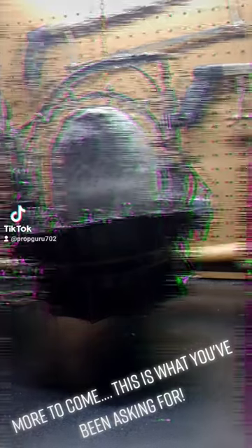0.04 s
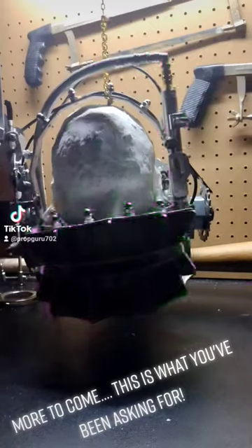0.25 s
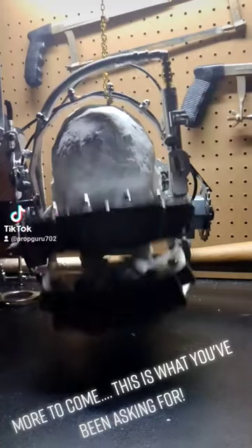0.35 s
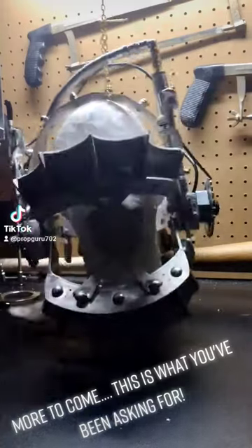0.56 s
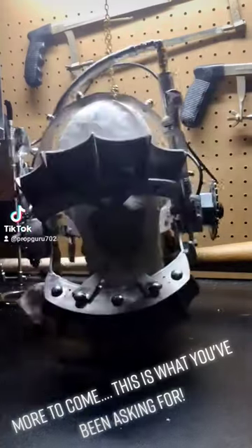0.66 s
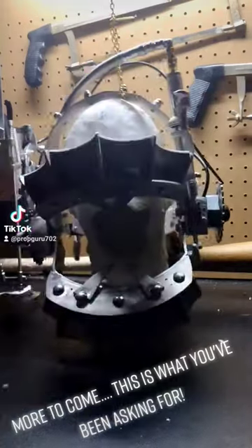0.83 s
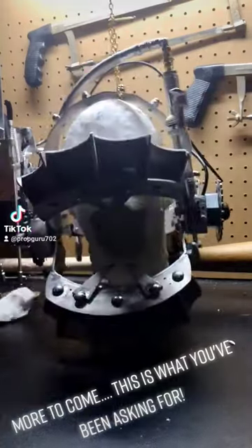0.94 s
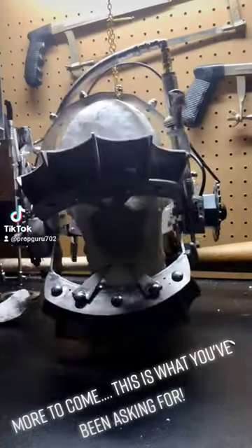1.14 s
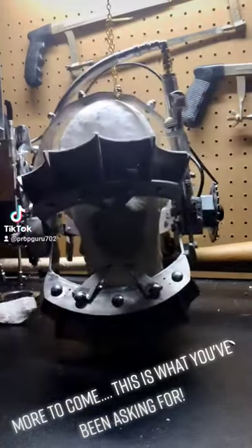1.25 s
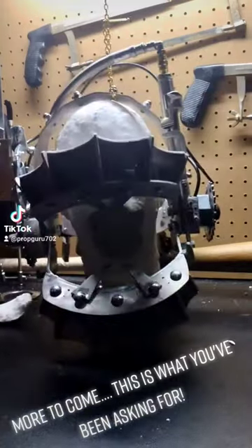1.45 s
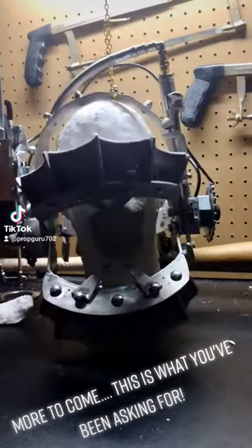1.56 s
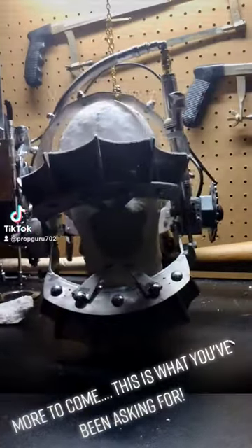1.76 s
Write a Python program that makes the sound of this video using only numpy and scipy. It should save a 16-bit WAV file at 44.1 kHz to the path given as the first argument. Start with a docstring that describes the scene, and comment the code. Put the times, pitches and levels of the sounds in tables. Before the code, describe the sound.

A steel mechanism snaps open on a workbench, close up in a small shop. Quiet low hum comes first, with a faint tick at 0.14 s. Loud, bright clashes hit at 0.22-0.26 s and again around 0.4-0.46 s, jangling and booming the bench. Bright air hiss swells, then fades from 0.75 s. Pieces clatter until 0.9 s; faint knocks continue to about 1.5 s.

```python
"""Steel trap on a workbench

A steel trap snaps open on a wooden bench in a small shop, close to a phone. Latch and jaws clash as
noise bursts and ringing modes, and broken pieces crack, ring and tumble to rest. The bench booms as
modes driven by blows and the rocking frame. Air vents as fading coloured noise on the left, over a
quiet floor of shop air with a low hum."""
import sys
import numpy as np
from scipy import signal
from scipy.fft import rfft, irfft
from scipy.io import wavfile
from scipy.ndimage import uniform_filter1d

SR = 44100
rng = np.random.default_rng(int(sys.argv[2]) if len(sys.argv) > 2 else 0)


def gain_from_db(level_db):
    """Turn a decibel level (scalar or array-like) into a linear amplitude factor."""
    decades = np.asarray(level_db, float) / 20
    return 10 ** decades


def output_pcm(signal):
    """Save a mono or channel-first signal as 16-bit PCM at the path in sys.argv[1].

    Samples are clipped to [-1, 1] before scaling.
    """
    pcm = np.clip(np.atleast_2d(signal).T, -1, 1) * 32767
    wavfile.write(sys.argv[1], SR, np.round(pcm).astype(np.int16))


N = 79380  # length in samples: 1.8 s


def level(x, db):
    """Scale to an rms level in dB."""
    return x * gain_from_db(db) / np.sqrt(np.mean(x ** 2))


def curve(rows):
    """Gain over time from (seconds, dB) rows, practically silent outside them."""
    rows = np.array(rows)
    t = np.arange(N) / SR
    return gain_from_db(np.interp(t, rows[:, 0], rows[:, 1], left=-140, right=-140))


def colour(x, points):
    """Weight the spectrum by (Hz, dB) points joined along a logarithmic frequency scale."""
    p = np.array(points)
    size = x.shape[-1]
    hz = np.maximum(np.arange(size // 2 + 1) * SR / size, 1)
    gain = gain_from_db(np.interp(np.log(hz), np.log(p[:, 0]), p[:, 1]))
    return irfft(rfft(x) * gain, size)


def ring(x, modes, longest_s):
    """Damped resonances set going by x; a unit click gives each about its table level."""
    out = 0
    for k, (hz, db, t60) in enumerate(modes):
        radius = np.exp(-np.log(1000) / (min(t60, longest_s) * SR))
        angle = 2 * np.pi * hz / SR
        poles = [1, -2 * radius * np.cos(angle), radius * radius]
        mode = signal.lfilter([0, np.sin(angle)], poles, x)
        out = out + (-1) ** k * gain_from_db(db) * mode  # every other mode is flipped in sign
    return out


def band(x, hz, width):
    """Gentle band-pass around hz, width in octaves each way."""
    edges = [hz / 2 ** width, min(hz * 2 ** width, .45 * SR)]
    return signal.lfilter(*signal.butter(1, edges, "band", fs=SR), x)


def decay(t60, size):
    """Exponential fall by 60 dB in t60 seconds (at least 0.01), after a 0.17 ms rise."""
    t = np.arange(size) / SR
    return np.minimum(t / 0.00017, 1) * np.exp(-np.log(1000) * t / max(t60, .01))


def add(out, s, x):
    """Mix x in at time s, in seconds."""
    i = int(s * SR)
    out[..., i:i + x.shape[-1]] += x[..., :N - i]


def grains(per_s, spread_db):
    """Random clicks of either sign, uneven but bounded in size."""
    u = rng.random((3, N))
    happens = u[0] < per_s / SR
    size = gain_from_db(spread_db * np.minimum(-np.log(u[2] + 1e-9), 2))
    return happens * np.sign(u[1] - .5) * size


def pan(x, db):
    """Place by level: left louder than right by db; x is one or two channels."""
    return x * gain_from_db(np.array([[db / 2], [-db / 2]]))


# Clashes of steel on steel. Each row: start in seconds, relative level in dB, brightness in octaves
# above 1 kHz, crack's fall by 60 dB in seconds, push on the bench in dB relative to the clash.
STEEL_CLASHES = [(0.1404, -39.5, 2.22, 0.014, -17.5), (0.2208, -8, 1.7, 0.013, -25.5),
                 (0.237, -1, 1.38, .05, -12), (0.2582, -3, 1.4, 0.26, -0.5), (0.368, -25.5, 0.2, .04, 11),
                 (0.392, -3, 0.65, 0.11, -1), (0.409, -9.5, 1.4, 0.091, -1), (0.426, -14, 1, 0.04, 2),
                 (0.46, -8.5, 0.76, 0.08, -6.5)]
# Resonances of the frame. Each row: frequency in Hz, level in dB, longest fall by 60 dB in seconds.
STEEL_MODES = [(1178, -5, 5.0), (1901, -21.5, 0.83), (2277, -20.5, 5.0), (2987, -14, 0.36),
               (3230, -10.5, 0.87), (3170, -1, 0.36), (3680, -9.5, 1.7), (3810, -9.5, 0.63),
               (4450, -8.5, 0.31), (4665, -14, 0.85), (5766, -8, 0.15), (6390, -26, 5.0),
               (6702, -11.5, 0.13), (7235, -24.5, 0.14)]


def steel():
    """Each clash: a crack with thin treble, a duller jangle and frame modes, all chattering; pushes the bench."""
    treble_db, jangle_db, strike_db = -13.5, -13, -62.5
    jangle_t60_s, ring_t60_s = 0.35, 0.45  # longest allowed
    chatter_per_s, chatter_share = 1200, 0.55
    out, push = np.zeros((2, N)), np.zeros(N)
    # each click lifts the loudness, which sinks back within milliseconds
    clicks = np.abs(grains(chatter_per_s, 1.3))
    chatter = level(signal.lfilter([1], [1, -.985], clicks), 0)
    chatter = 1 - chatter_share + chatter_share * chatter
    for s, db, octave, t60, thump_db in STEEL_CLASHES:
        n = rng.standard_normal((3, 16384))
        n = 0.38 * n[0] + 1.2 * n[1:]  # partly alike in both channels
        hz = 1000 * 2 ** octave
        body = level(band(band(n, hz, 1.76), hz, 1.76), -7)
        treble = gain_from_db(treble_db) * band(n, 9000, .9)
        crack = (body + treble) * decay(t60, size=16384)
        jangle = level(band(body, hz * .5, 1.3), jangle_db)
        jangle = jangle * decay(min(jangle_t60_s, 6 * t60), size=16384)
        strike = level(n * decay(0.029, size=16384), strike_db)
        modes = ring(strike, STEEL_MODES, min(ring_t60_s, 3 * t60))
        add(out, s, gain_from_db(db) * (crack + jangle + modes))
        add(push, s, -gain_from_db(db + thump_db) * np.hanning(40))
    return pan(out * chatter, 0.4), push


# Pieces landing on the bench. Each row: start in seconds, relative level in dB, brightness in octaves
# above 1 kHz, ring time in seconds (the ring may fall by 60 dB in up to 1.5 times this).
LANDINGS = [(0.581, -15, 0.84, 0.27), (0.598, -18.5, 0.37, 0.034), (0.606, -30, 1.8, 0.022),
            (0.618, -14, .9, 0.027), (0.638, -7.5, 1.28, 0.02), (0.664, -14.5, 0.49, 0.11),
            (0.755, -15, 0.081, 0.023), (0.78, -16, -0.27, 0.039), (0.792, -19, 0.33, 0.15),
            (0.8061, -6.5, 1.22, 0.1), (0.825, -20.5, 0.16, 0.21), (0.862, -15.5, 0.33, 0.088),
            (0.904, -42, 0.76, 0.03), (0.981, -34, -.5, 0.097), (1.024, -39.5, -0.57, 0.05),
            (1.087, -28.5, 0.03, 0.056), (1.143, -30, 0.85, 0.055), (1.149, -31.5, -0.52, .06),
            (1.166, -32.5, 1.38, 0.071), (1.275, -37, -0.34, 0.09), (1.372, -41.5, -0.33, 0.064),
            (1.434, -38, 1.16, 0.079), (1.443, -34, -0.029, 0.057), (1.459, -32, -0.31, 0.11),
            (1.493, -32, 1.2, 0.06), (1.501, -33.5, -0.63, 0.074), (1.526, -48.5, 1.21, 0.058)]
# Resonances of a piece. Each row: frequency in Hz, level in dB, longest fall by 60 dB in seconds.
PIECE_MODES = [(578.4, 2.5, 0.064), (755, -6.5, 0.12), (841, 5, 0.05), (1000, 4, 0.061), (1130, -4.5, 0.21),
               (1391, 2.5, 0.12), (1606, 3, 0.017), (1833, -0.5, 0.02), (2350, -2, 0.025),
               (2576, 0.5, 0.068), (2954, 1, 0.031), (3256, -14.5, 0.15), (3612, -2.5, 0.1),
               (4120, -4, 0.05)]
# Tumbling between landings. Each row: time in seconds, level in dB before a 3.5 dB cut.
TUMBLE_LEVEL = [(0.43, -16.5), (0.456, -49), (0.464, -17), (0.478, -29), (0.574, -32.5), (0.582, -28),
                (0.632, -30), (0.638, -21), (0.692, -40), (0.8, -28.5), (0.806, -22.5), (0.856, -30),
                (0.864, -23.5), (0.948, -49.5), (1.078, -62), (1.086, -44.5), (1.418, -63.5),
                (1.464, -54.5), (1.632, -66.5), (1.8, -65.5)]


def pieces():
    """Landings crack and ring a piece, each with its own brightness; small random contacts fill the gaps."""
    ring_db, crack_t60_s, thump_db = -13, 0.036, -19.5
    out, push = np.zeros((2, N)), np.zeros(N)
    for s, db, octave, t60 in LANDINGS:
        n = rng.standard_normal((3, 8192))
        n = .7 * n[0] + .7 * n[1:]
        hz = 1000 * 2 ** octave
        modes = ring(n * decay(t60 / 4, size=8192), PIECE_MODES, t60 * 1.5)
        modes = band(band(modes, hz, 0.55), hz, 0.55)
        modes = modes * gain_from_db(ring_db) / modes[:, :882].std()  # level of the first 20 ms
        crack_hz = 0.63 * hz
        crack = band(band(n, crack_hz, 1.3), crack_hz, 1.3)
        # harder landings crack more
        crack = level(crack, 0.5 + 0.43 * db) * decay(crack_t60_s, size=8192)
        add(out, s, gain_from_db(db) * (modes + crack))
        add(push, s, -gain_from_db(db + thump_db) * np.hanning(40))
    small = np.array([grains(per_s=720, spread_db=6.5) for _ in range(3)])
    contacts = small[0] + 0.23 * small[1:]  # mostly alike in both channels
    tumble = level(ring(contacts, PIECE_MODES, .011), -3.5) * curve(TUMBLE_LEVEL)
    return pan(out + tumble, 2.4), push


# Resonances of the bench top. Each row: frequency in Hz, level in dB, longest fall by 60 dB in seconds.
BENCH_MODES = [(118.2, -1.5, 0.28), (169.8, -7, .12), (197.6, -4.5, 0.21), (233, -10.5, 0.17),
               (273.7, -8, 0.43), (349.3, -2.5, 0.15), (437.5, -2, 0.099), (525, -7.5, 0.13),
               (559, -11, 0.084), (652, -3, 0.056), (824, -1.5, .1), (874, 2, 0.027)]
# Frame rocking on the bench. Each row: time in seconds, level in dB before a 2.5 dB cut.
ROCKING_LEVEL = [(0.228, -41), (0.254, -14.5), (0.432, -11.5), (0.572, -33.5), (0.594, -30.5), (0.748, -39),
                 (0.792, -39), (0.862, -43), (0.896, -34.5), (0.954, -51), (1.444, -56.5), (1.496, -47.5),
                 (1.62, -63), (1.8, -64.5)]


def bench(push):
    """The top booms from the blows and from the rocking frame; its sound is cut steeply below about 84 Hz."""
    longest_s, low_hz = 0.35, 84
    rock = np.array([band(grains(per_s=550, spread_db=6.7), 250, 1.1) for _ in range(2)])
    middle = ring(rock[0], BENCH_MODES, longest_s)
    # opposite signs left and right make the rocking wide
    side = .6 * band(ring(rock[1], BENCH_MODES, 0.1), 230, 0.63) * np.array([[1], [-1]])
    rocking = level(middle + side, -2.5) * curve(ROCKING_LEVEL)
    boom = gain_from_db(-41) * ring(push, BENCH_MODES, longest_s)
    thud = gain_from_db(8.5) * band(push, 450, 1.3)
    bass_cut = signal.butter(4, low_hz, "high", fs=SR, output="sos")
    return signal.sosfilt(bass_cut, rocking + boom + thud)


# Loudness of the venting air. Each row: time in seconds, level in dB.
VENT_LEVEL = [(0.26, -60), (0.3, -33.5), (0.36, -31), (0.42, -22.5), (0.47, -23), (0.574, -22.5),
              (0.72, -24), (0.77, -33), (0.84, -31.5), (1.036, -35), (1.206, -40), (1.352, -46),
              (1.46, -54.5), (1.58, -58), (1.8, -67.5)]
# Tone of the venting air. Each row: frequency in Hz, relative spectrum level in dB.
VENT_TONE = [(1200, -29.5), (2500, -12), (4000, -10.5), (6000, -11.5), (7500, -11), (8600, -7),
             (11000, -10.5), (13500, -6), (15000, -1), (16000, -2)]


def vent():
    """Escaping air is bright coloured noise with a slight flutter, partly alike in both channels."""
    flutter_db = 1.27  # rms
    n = rng.standard_normal((4, N))
    flutter = gain_from_db(flutter_db * level(uniform_filter1d(n[3], size=1500), 0))
    hiss = level(colour(0.41 * n[0] + 1.2 * n[1:3], VENT_TONE), 0)
    return pan(hiss * curve(VENT_LEVEL) * flutter, 3.5)


def room(x):
    """Reflections blur into a short noise-like tail, different at each channel."""
    t60_s, tail_db, top_hz = 0.3, -12, 7000
    tail = band(rng.standard_normal((2, 16384)), top_hz / 5, 1.385) * decay(t60_s, size=16384)
    tail = np.pad(tail, ((0, 0), (180, 0)))  # starts 4 ms after the direct sound
    tail = gain_from_db(tail_db) * tail / np.sqrt((tail ** 2).sum(axis=1, keepdims=True))
    return x + signal.fftconvolve(x, tail, axes=1)[:, :N]


# Tone of the shop air. Each row: frequency in Hz, relative spectrum level in dB.
FLOOR_TONE = [(25, -13.5), (80, -25), (100, -14), (120, -7), (145, -13.5), (300, -21), (600, -27),
              (2000, -32.5), (14500, -40.5), (16000, -53)]


def floor():
    """Shop air is quiet coloured noise; the hum is a sine that wavers in loudness."""
    air_db, hum_hz, hum_peak_db = -67, 114, -64.6186
    n = rng.standard_normal((4, N))
    waver = 1 + 0.0942857 * level(uniform_filter1d(n[3], size=3000), 0)
    hum = gain_from_db(hum_peak_db) * waver * np.sin(2 * np.pi * hum_hz * np.arange(N) / SR)
    air = level(colour(.8 * n[0] + .6 * n[1:3], FLOOR_TONE), air_db)
    return air + hum


def scene():
    """All sources in the shop; all but the floor reach the left channel slightly late."""
    left_lag = 4  # samples
    clash, heavy_push = steel()
    knocks, light_push = pieces()
    near = room(clash + knocks) + bench(heavy_push + light_push) + vent()
    return np.array([np.roll(near[0], left_lag), near[1]]) + floor()


def band_limit(x):
    """A steep low-pass at the top of the band."""
    return signal.sosfilt(signal.butter(12, 16270, fs=SR, output="sos"), x)


def record(dry):
    """The phone softly rounds the loudest peaks and loses the very top."""
    top_hz = 15450
    rounded = np.tanh(0.91 * dry) / 1.049
    top_cut = signal.ellip(10, .2, 80, top_hz, fs=SR, output="sos")
    mix = signal.sosfilt(top_cut, rounded)
    return band_limit(mix)


dry = scene()
out = record(dry)
output_pcm(out)
```